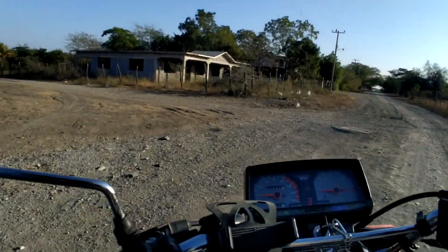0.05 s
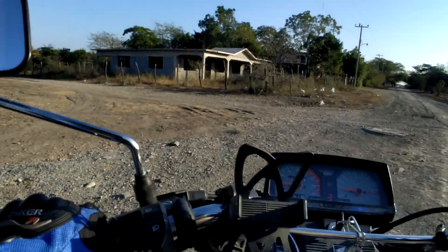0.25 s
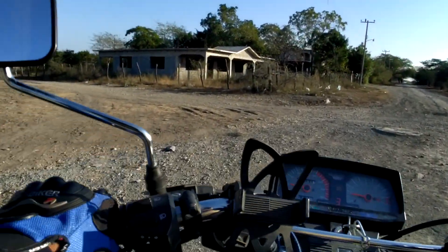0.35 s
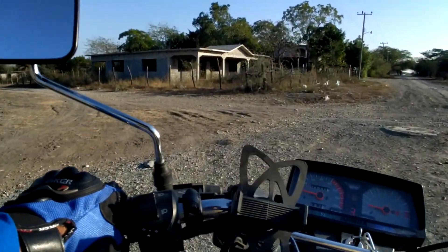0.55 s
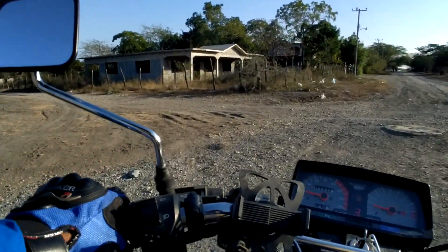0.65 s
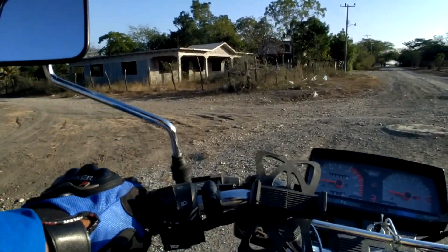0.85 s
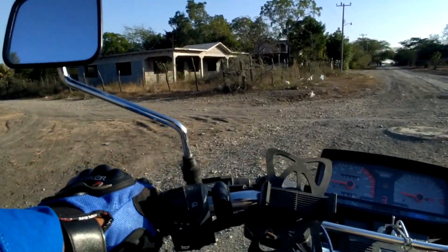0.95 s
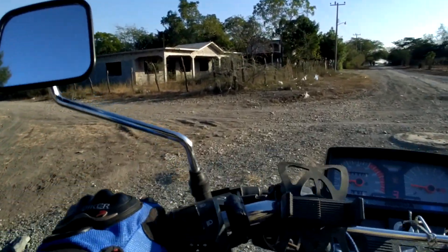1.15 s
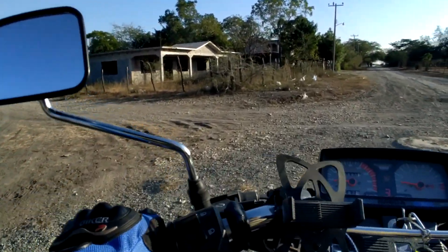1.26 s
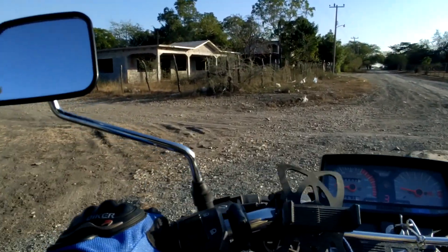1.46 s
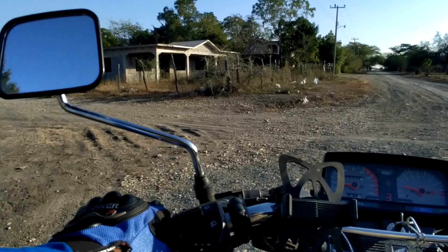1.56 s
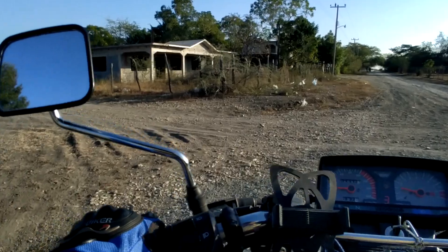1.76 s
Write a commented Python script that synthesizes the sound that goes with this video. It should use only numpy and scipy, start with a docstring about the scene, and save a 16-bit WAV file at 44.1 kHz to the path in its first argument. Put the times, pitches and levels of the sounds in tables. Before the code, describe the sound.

A single-cylinder motorcycle idles close by with sharp metallic ticks and soft exhaust thumps, then revs into a faster, hissing clatter and settles; wind slaps the rider's microphone, mostly early, outdoors on gravel.

```python
"""Gravel, ridden slowly: a single-cylinder four-stroke motorcycle, with the microphone close by on the rider.
The engine idles, gets a blip of throttle and falls back. Each cycle has two valve ticks, the first with a
crack, a ring of the casing, an exhaust thump and a puff of hiss, made from clicks, noise, resonances and
short shaped tones. Loose metal chinks and the tyres rumble low. Gusts of lumpy noise buffet the microphone,
mostly in the first second, with single slaps of about one cycle."""
import sys
import numpy as np
from scipy import signal
from scipy.fft import rfft, irfft
from scipy.io import wavfile
from scipy.ndimage import uniform_filter1d

SR = 44100
rng = np.random.default_rng(int(sys.argv[2]) if len(sys.argv) > 2 else 0)


def int16_out(signal):
    """Quantize to a 16-bit WAV file."""
    q = np.round(np.clip(np.atleast_2d(signal).T, -1, 1) * 32767)
    wavfile.write(sys.argv[1], SR, q.astype(np.int16))


def elevation(decibels):
    """Turn decibel levels (scalar or array-like) into linear amplitude ratios."""
    levels = np.asarray(decibels, float)
    return 10 ** (levels / 20)


N = 79380
T = np.arange(N) / SR  # time [s]

# engine effort: (time [s], hiss before its lift [dB], exhaust thump [dB], casing ring [dB], valve tick [dB])
ENGINE_EFFORT = [(0.0, -59, -59, -53.5, -30.5), (0.094, -62.5, -42, -48.5, -36),
                 (0.194, -60, -42, -58.5, -39), (0.21, -66.5, -37, -48.5, -35),
                 (0.386, -59.5, -40, -57, -35.5), (0.65, -60.5, -35, -54.5, -38),
                 (0.826, -54.5, -47, -49.5, -35.5), (0.886, -55.5, -36, -55.5, -38),
                 (0.916, -54, -42, -55.5, -36.5), (1.242, -41, -39, -41.5, -44),
                 (1.292, -42, -39.5, -44.5, -45.5), (1.362, -41, -43.5, -40, -41.5),
                 (1.508, -45.5, -44.5, -47, -38), (1.8, -52, -50.5, -48, -32.5)]
EFFORT_REF_DB = -46.5  # hiss column at which the resonances have their listed levels
# the valve tick that opens each cycle: (time [s], crack [dB], thump that follows against the effort [dB])
VALVE_TICKS = [(0.0245, -45.5, -2), (0.1196, -46.5, 2), (0.2121, -45.5, 5), (0.3098, -47.5, -0.5),
               (0.406, -52.5, 1.5), (0.5006, -57, 6), (0.596, -50.5, -2.5), (0.6897, -45, -1),
               (0.7773, -51, -6), (0.859, -46.5, -0.5), (0.9343, -44, 1.5), (1.0059, -39.5, 1),
               (1.0707, -40, -1.5), (1.1291, -33, 0.5), (1.1837, -29.5, 0.5), (1.2366, -31, 3),
               (1.2855, -30.5, -0.5), (1.3329, -27, 1), (1.3794, -27.5, -2.5), (1.4264, -26.5, 6),
               (1.4751, -32.5, 0.5), (1.5279, -31, 0), (1.5828, -32, -5.5), (1.6394, -32, 2),
               (1.697, -45, 2), (1.76, -42.5, -1.5)]

# metal around the valves: (centre [Hz], width [Hz], first tick [dB], second tick [dB], chatter [dB],
# gain per dB of effort [dB])
HEAD_METAL = [(2127, 150, -7, -10, -23, 3), (2900, 93, -3.5, -52, 1, 1.76), (3080, 74, -2.5, -30, -42, 1.5),
              (3950, 330, 2, 0.5, 10.5, 1.9), (4920, 120, -4, -34, -6, 1.75),
              (5330, 140, 3.5, -24, -19, 1.5), (5630, 44, 4.5, -24, -8, 0.6),
              (6750, 180, -5, -30, 9.5, 1.5), (7170, 140, 2.5, -31, 5, 1.7), (8460, 190, 3, 3, -37, 1.33),
              (8770, 120, -3, -23, -32, 1), (9170, 120, -4, 4.5, -41, 1.45),
              (10000, 300, -3.5, -20, -42, 0.76), (11520, 880, 0, -7, -25, 1.36),
              (13100, 580, -5, -9, -20, 1), (14800, 290, -9, -6, -28, 1.2), (15100, 280, 3, -16, -15, 1)]
# loose cover near the valves: (centre [Hz], width [Hz], first tick [dB], second tick [dB], chatter [dB])
LOOSE_COVER = [(3354, 170, 0.5, -9.5, 6), (3544, 127, -2, -4, 2)]
# how hard the cover is shaken, most as the throttle opens: (time [s], level [dB])
COVER_SHAKING = [(0, -48), (.55, -49), (.7, -38.5), (.95, -35), (1.1, -34), (1.35, -35.5), (1.55, -40),
                 (1.8, -42)]
SECOND_TICK_AT, TICK_SCATTER_DB = 0.59, 1.5  # place in the cycle 0-1; unevenness
CHATTER_DB, CHATTER_PER_S = -21.5, 630  # small random taps of the valve gear between the ticks
RATTLE_RISE_S, RATTLE_DECAY_S, RATTLE_ROUGH = 0.0003, 0.0031, 0.025  # roughness as a share of pitch

# relative spectrum of the crack: (frequency [Hz], level [dB])
CRACK_SPECTRUM = [(900, -13.5), (2100, -10), (2600, -5.5), (3250, -2.5), (3650, -7.5), (4050, -8),
                  (4600, -3.5), (5000, -2.5), (5600, 2.5), (6100, -15.5), (7100, -2.5), (10000, -10),
                  (15000, -16)]
# bands that ring on after the crack: (centre [Hz], width [Hz], level [dB])
CRACK_TAIL = [(3370, 260, -3.5), (3920, 230, 0), (5040, 200, 3), (5643, 110, 5.5), (7000, 160, -2.5)]
CRACK_DECAY_S, TAIL_DECAY_S = 0.0038, 0.0086

# casing resonances: (centre [Hz], width [Hz], relative level [dB], gain per dB of effort [dB])
CASING_RESONANCES = [(580, 98, -26, 0), (824, 19.7, 7, 0.04), (974, 49, 4, -0.28), (1093, 30, 6, 0.27),
                     (1198, 46, 5, -0.11), (1337, 52, 3, -0.1), (1470, 190, -24, 0.5)]
RING_AT, RING_AGAIN_AT, RING_AGAIN_DB = 0.28, 0.718, -10  # places in the cycle 0-1
RING_NARROW, RING_STEADY = 9, 0.45  # sharpness of each shake; steady part of the first
CASING_WANDER_DB, CASING_WANDER_S, CASING_GRAIN_DB = 2.5, 0.027, 1.5
# short rings of the casing, most of them during the throttle blip:
# (time [s], length [s], level before flutter [dB], pitch [Hz])
CASING_TONES = [(.315, 0.052, -54, 1320), (0.426, 0.011, -52.5, 1000), (.48, 0.029, -56, 1340),
                (0.881, 0.027, -44, 955), (0.917, 0.014, -58.5, 990), (.952, 0.021, -41.5, 985),
                (0.981, 0.0093, -43, 1020), (1.021, 0.011, -39.5, 1080), (1.05, 0.028, -44, 1042),
                (1.081, 0.01, -41, 1016), (1.098, 0.021, -49, 1210), (1.137, 0.036, -44, 1330),
                (1.196, 0.011, -40, 1100), (1.244, 0.019, -40, 1123), (1.249, 0.048, -44, 1350),
                (1.318, 0.023, -41.5, 1080), (1.345, .018, -47, 996), (1.342, 0.023, -37.5, 1120),
                (1.363, 0.034, -40, 989), (1.392, 0.0091, -42, 1175), (1.412, 0.01, -41, 1020),
                (1.428, 0.026, -47, 560), (1.463, .016, -46, 986), (1.467, .03, -50.5, 572.4),
                (0.796, .03, -51, 1054), (1.16, 0.024, -47, 1138), (1.277, 0.03, -45, 988),
                (1.378, 0.026, -49, 581), (1.51, 0.036, -58, 569)]
RING_EDGE_S, RING_WAVER, RING_FLUTTER_DB = 0.0039, 0.03996, 2.5  # waver as a share of pitch

PIPE_HZ, PIPE_WIDTH_HZ, PIPE_WANDER = 105.6, 61, 0.06  # wander as a share of pitch
THUMP_AT = 0.4396  # place in the cycle 0-1

# relative spectrum of the hiss: (frequency [Hz], level per Hz [dB])
HISS_SPECTRUM = [(180, -26), (300, 1.5), (528, -15), (583, -6), (1110, -3), (1580, -5.5), (3170, -11),
                 (3940, -9), (4890, -9.5), (5580, -9.5), (5970, -8.5), (8050, -6.5), (15900, -25)]
# relative spectrum of the steady whirr: (frequency [Hz], level per Hz [dB])
WHIRR_SPECTRUM = [(290, 32), (500, 3), (687, 36), (987, 30), (1090, -59), (1320, 66), (2190, 39), (3430, 5),
                  (3850, 19), (5690, -20), (15900, -46)]
WHIRR_DB, HISS_LIFT_DB, HISS_PATCHY_DB = -65.5, 2, 3.2
HISS_AT, HISS_NARROW, HISS_STEADY = 0.43, 0.33, 0.84  # place in the cycle 0-1, sharpness, steady part
GRIT_PER_S, GRIT_DB = 220, -13

# loose parts that chink: (time [s], level before a 9.5 dB cut [dB], pitch [Hz], fall by 60 dB [s])
LOOSE_CHINKS = [(0.0004, -26.5, 14300, 0.027), (0.025, -26.5, 13740, 0.041), (0.2333, -46, 13600, 0.036),
                (0.828, -37, 8150, 0.034), (1.5119, -54, 8070, 0.023), (1.659, -34, 13100, 0.12)]

# wind on the microphone: (time [s], level before the lift [dB], brightness [0-1])
WIND_GUSTS = [(0.0, -57, 0.92), (0.07, -47, 0.95), (0.09, -50.5, 0), (0.14, -29.5, 0.77), (0.18, -42, 0.66),
              (0.21, -21, 0.27), (0.25, -21.5, 0.86), (0.274, -27, 0.27), (0.41, -51.5, 0.2),
              (0.446, -32, 0.1), (0.516, -24, 0.41), (0.53, -38, 0.7), (0.56, -20, 0.35),
              (0.6, -38.5, 0.42), (0.732, -37, 0.3), (0.746, -31.5, 0.1), (0.812, -30.5, 0.16),
              (0.862, -34, 0.34), (0.886, -22.5, 0), (0.946, -37.5, 0), (1.102, -54, 1), (1.182, -41, 0),
              (1.398, -48, 1), (1.418, -36, 0.04), (1.724, -67, 0.2), (1.8, -54, 1)]
# relative spectrum of dull wind: (frequency [Hz], level [dB])
DULL_WIND = [(20, -33), (45, -6.5), (100, -1.5), (180, -2), (300, -17.5), (500, -28.5), (900, -92),
             (3000, -100)]
# relative spectrum of bright wind: (frequency [Hz], level [dB])
BRIGHT_WIND = [(20, -15), (60, -6), (140, -3), (250, -4), (450, -12.5), (750, -17.5), (1300, -39),
               (2200, -45), (5000, -100)]
GUST_LIFT_DB, LUMPY_DB, LUMP_S = -2.5, 2, 0.0062
# single strong eddies that slap the microphone: (time [s], level before centring on zero [dB], pitch [Hz])
WIND_SLAPS = [(0.138, -24.5, 253), (0.147, -25.5, 206), (0.2097, -10, 294), (0.2107, -26, 1100),
              (0.2119, -9, 434), (0.2175, -8.5, 207), (0.2234, -15.5, 255), (0.2277, -11.5, 227),
              (0.2391, -18.5, 256), (0.2436, -13, 210), (.248, -15, 332), (0.2555, -27.5, 880),
              (0.2555, -12.5, 238), (0.2953, -17, 115), (0.453, -37, 198), (0.463, -24, 178),
              (0.472, -25, 295), (0.482, -24, 150), (0.507, -23, 250), (0.5128, -13.5, 292),
              (0.524, -25, 181), (0.545, -23, 169), (0.549, -19, 303), (0.5563, -15, 226),
              (0.571, -18.5, 118), (0.58, -26.5, 202), (0.755, -27.5, 175), (0.802, -23.5, 200),
              (0.819, -21, 221), (0.846, -17, 153), (0.8817, -21, 220), (0.916, -25, 109),
              (1.189, -25.5, 222), (1.421, -31.5, 168), (1.461, -27, 130), (1.475, -25.5, 147),
              (1.502, -22.5, 130), (1.511, -26, 110), (1.564, -30.5, 128)]
SLAP_CYCLES, SLAP_ROUND = 0.51, 1.55  # half-length in cycles, exponent of the outline

# relative spectrum of the tyre rumble: (frequency [Hz], level [dB])
TYRE_RUMBLE = [(15, -12), (30, 5), (60, 2), (100, 8), (160, 3), (400, -92)]
TYRE_DB = -47

MIC_LOW_HZ = 40.7


def evened(x):
    """Scales to rms 1."""
    return x / np.sqrt(np.mean(x ** 2) + 1e-20)


def curve(table, column):
    """One column of a table, drawn as straight lines over time."""
    rows = np.array(table)
    return np.interp(T, rows[:, 0], rows[:, column])


def coloured(x, points):
    """Filters by a spectrum read on a log-frequency axis, then scales to rms 1."""
    hz, db = np.transpose(points)
    gain_db = np.interp(np.log(np.fft.rfftfreq(N, 1 / SR) + 1), np.log(hz + 1), db)
    return evened(irfft(rfft(x) * elevation(gain_db), N))


def resonate(x, hz, width_hz):
    """Shifts hz down to zero, smooths, shifts back: a resonance of gain 1."""
    turn = np.exp(2j * np.pi * np.cumsum(hz * np.ones(N)) / SR)
    r = np.exp(-np.pi * width_hz / SR)
    return 2 * (turn * signal.lfilter([1 - r], [1, -r], x / turn)).real


def drift(seconds):
    """Chance wandering: noise smoothed twice over a span of seconds, rms 1."""
    span = int(seconds * SR) + 1
    return evened(uniform_filter1d(uniform_filter1d(rng.standard_normal(N), span), span))


def sparse_taps(per_s):
    """Single-sample taps at random moments, of random size and sign."""
    return (rng.random(N) < per_s / SR) * rng.standard_normal(N)


def engine_phase():
    """Counts engine cycles, a whole number at each tick; the end speeds carry on past the ends."""
    s = np.array(VALVE_TICKS)[:, 0]
    s = np.concatenate([[2 * s[0] - s[1]], s, [2 * s[-1] - s[-2]]])
    return np.interp(T, s, np.arange(len(s)))


def effort_above_reference():
    """Engine effort in dB, taken from the hiss column."""
    return curve(ENGINE_EFFORT, column=1) - EFFORT_REF_DB


def beats(phase, place, scatter_db):
    """One click each cycle at a place, its size scattered by chance."""
    turn = np.floor(phase - place)
    size = elevation(scatter_db * rng.standard_normal(40))[(turn - turn[0]).astype(int)]
    return np.diff(turn, prepend=turn[0]) * size


def puff(phase, place, narrow, steady):
    """A swell once a cycle over a steady part, rms 1."""
    return evened(steady + np.exp(narrow * (np.cos(2 * np.pi * (phase - place)) - 1)))


def valve_rattle(phase, place):
    """Each closing valve gives a shake that swells fast and dies within a few ms."""
    rise = np.exp(-1 / (RATTLE_RISE_S * SR))
    fade = np.exp(-1 / (RATTLE_DECAY_S * SR))
    clicks = beats(phase, place, TICK_SCATTER_DB)
    return signal.lfilter([1 - rise], np.convolve([1, -rise], [1, -fade]), clicks)


def valves(phase):
    """Closing valves shake the resonances of head and cover; small taps keep them ringing between ticks."""
    effort_db, tick_db = effort_above_reference(), curve(ENGINE_EFFORT, column=4)
    shaken_db = curve(COVER_SHAKING, column=1)
    parts = [(*row[:-1], tick_db + row[-1] * effort_db) for row in HEAD_METAL]
    parts += [(*row, shaken_db) for row in LOOSE_COVER]
    first, second = valve_rattle(phase, 0), valve_rattle(phase, SECOND_TICK_AT)
    out = np.zeros(N)
    for hz, width_hz, first_db, second_db, chatter_db, level_db in parts:
        rough_hz = hz * (1 + RATTLE_ROUGH * drift(0.0004))
        buzz = np.cos(2 * np.pi * np.cumsum(rough_hz) / SR)
        ticks = (elevation(first_db) * first + elevation(second_db) * second) * buzz
        # narrow resonances answer a tap weakly, so scale by width
        chatter = sparse_taps(CHATTER_PER_S) * SR / (2 * np.pi * width_hz)
        drive = ticks + elevation(CHATTER_DB + chatter_db) * chatter
        out += elevation(level_db) * resonate(drive, hz, width_hz)
    return out


def tick_fades(decay_s):
    """An exponential fade from each cycle-opening tick, at the level of its crack."""
    return sum((T >= s) * elevation(db) * np.exp(-np.maximum(T - s, 0) / decay_s) for s, db, _ in VALVE_TICKS)


def cracks():
    """The tick that opens each cycle has a sharp wide crack of noise and leaves a ragged ring in a few bands."""
    crack = tick_fades(CRACK_DECAY_S) * coloured(rng.standard_normal(N), CRACK_SPECTRUM)
    tail = tick_fades(TAIL_DECAY_S)
    ring = sum(elevation(db) * resonate(tail * rng.standard_normal(N), hz, width_hz)
               for hz, width_hz, db in CRACK_TAIL)
    return crack + ring


def casing(phase):
    """The casing is shaken twice a cycle and rings near 1 kHz, now one resonance ahead, now another."""
    push = puff(phase, RING_AT, RING_NARROW, RING_STEADY)
    push = push + elevation(RING_AGAIN_DB) * puff(phase, RING_AGAIN_AT, RING_NARROW, 0)
    shake = push * rng.standard_normal(N) * elevation(CASING_GRAIN_DB * drift(0.0048))
    effort_db = effort_above_reference()
    out = np.zeros(N)
    for hz, width_hz, db, slope in CASING_RESONANCES:
        level_db = db + slope * effort_db + CASING_WANDER_DB * drift(CASING_WANDER_S)
        out += elevation(level_db) * resonate(resonate(shake, hz, width_hz), hz, 3 * width_hz)
    return elevation(curve(ENGINE_EFFORT, column=3)) * evened(out)


def casing_rings():
    """Short wavering, fluttering tones of the casing: a quick edge, a hold and a decay."""
    out = np.zeros(N)
    for s, length, db, hz in CASING_TONES:
        edge = np.clip((T - s) / RING_EDGE_S, 0, 1)
        shape = edge * np.exp(-np.maximum(T - s - length / 2, 0) / (length / 2))
        tone = np.cos(2 * np.pi * np.cumsum(hz * (1 + RING_WAVER * drift(0.00306))) / SR)
        out += elevation(db + RING_FLUTTER_DB * drift(0.0031)) * shape * tone * 2
    return out


def exhaust(phase):
    """One pressure pulse a cycle swells and dies through three chambers of the pipe, tuned alike."""
    hz = PIPE_HZ * (1 + PIPE_WANDER * drift(0.056))
    pulse = beats(phase, THUMP_AT, 0)
    for _ in range(3):
        pulse = resonate(pulse, hz, PIPE_WIDTH_HZ)
    cycle = np.clip(phase - THUMP_AT, 0, None).astype(int)
    thump_db = np.array([0, *np.array(VALVE_TICKS)[:, 2], 0])
    strength = uniform_filter1d(elevation(thump_db)[cycle], size=200)
    return elevation(curve(ENGINE_EFFORT, column=2)) * strength * evened(pulse)


def hiss(phase):
    """Patchy gritty hiss of gas and moving parts, puffing once a cycle, over a steady whirr."""
    noise = rng.standard_normal(N) + elevation(GRIT_DB) * evened(sparse_taps(GRIT_PER_S))
    z = signal.stft(noise, nperseg=256, noverlap=192)[2]
    patches = uniform_filter1d(rng.standard_normal(z.shape), size=3, axis=0)  # across frequency
    patches = evened(uniform_filter1d(patches, size=12, axis=1))  # along time
    patchy = signal.istft(z * elevation(HISS_PATCHY_DB * patches), nperseg=256, noverlap=192)[1][:N]
    gas = coloured(patchy, HISS_SPECTRUM) * puff(phase, HISS_AT, HISS_NARROW, HISS_STEADY)
    whirr = coloured(patchy[::-1], WHIRR_SPECTRUM)  # reversed, so it does not follow the gas
    return elevation(curve(ENGINE_EFFORT, column=1) + HISS_LIFT_DB) * gas + elevation(WHIRR_DB) * whirr


def chinks():
    """Short high rattles of loose metal: noise through two equal resonances, dying away."""
    out = np.zeros(N)
    for s, db, hz, t60 in LOOSE_CHINKS:
        fade = (T >= s) * elevation(db - 9.5 - 60 * np.maximum(T - s, 0) / t60)
        out += fade * evened(resonate(resonate(rng.standard_normal(N), hz, 1500.0), hz, 1500.0))
    return out


def wind_gusts():
    """Lumpy low turbulence at the microphone that blends from dull to bright with the gusts."""
    air = rng.standard_normal(N) * elevation(LUMPY_DB * drift(LUMP_S))
    bright = np.clip(curve(WIND_GUSTS, column=2), 0, 1)
    blend = (1 - bright) * coloured(air, DULL_WIND) + bright * coloured(air, BRIGHT_WIND)
    return blend * elevation(curve(WIND_GUSTS, column=1) + GUST_LIFT_DB)


def wind_slaps():
    """Single eddies push the microphone for about one cycle, each centred on zero pressure."""
    out = np.zeros(N)
    for s, db, hz in WIND_SLAPS:
        cycles = (T - s) * hz
        shape = np.exp(-abs(cycles / SLAP_CYCLES) ** SLAP_ROUND)
        wave = np.cos(2 * np.pi * cycles)
        out -= elevation(db) * shape * (wave - (shape * wave).sum() / shape.sum())
    return out


def tyre_rumble():
    """Steady low noise of the tyres on the road."""
    return elevation(TYRE_DB) * coloured(rng.standard_normal(N), TYRE_RUMBLE)


def scene():
    """Engine close by, then loose parts, wind and tyres, in one channel."""
    phase = engine_phase()
    engine = valves(phase) + cracks() + casing(phase) + casing_rings() + exhaust(phase) + hiss(phase)
    return (engine + chinks() + wind_gusts() + wind_slaps() + tyre_rumble())[None]


def top_cut(x):
    """Nothing passes above the cut-off."""
    return signal.sosfilt(signal.butter(12, 17080, fs=SR, output="sos"), x)


def record(dry):
    """The microphone drops the deepest bass."""
    high_pass = signal.butter(2, MIC_LOW_HZ, "high", fs=SR, output="sos")
    mix = signal.sosfilt(high_pass, dry)
    return top_cut(mix)


dry = scene()
out = record(dry)
int16_out(out)
```